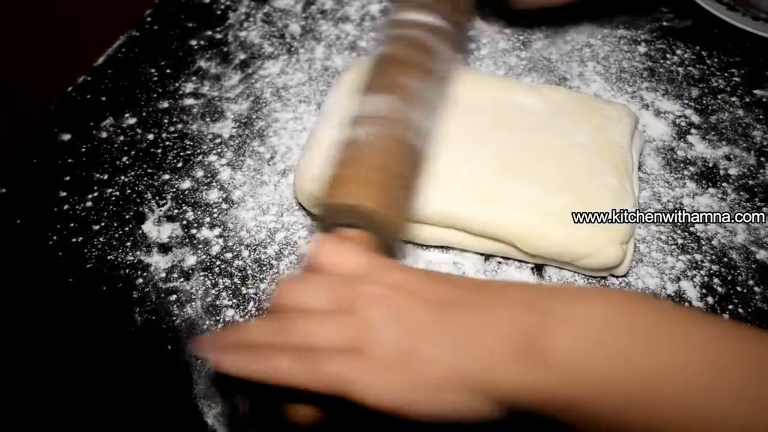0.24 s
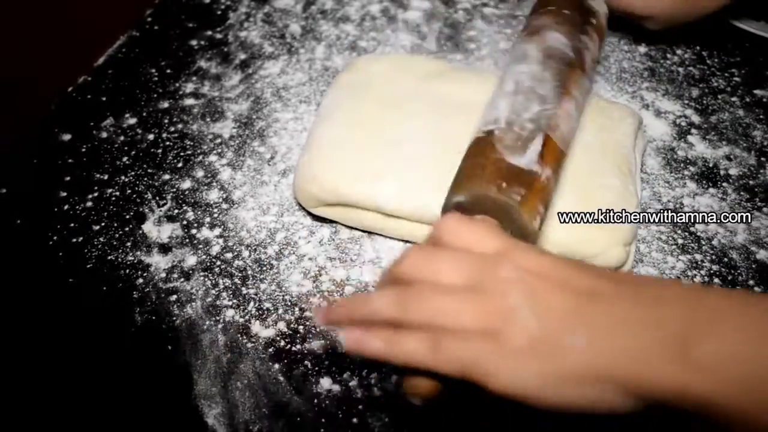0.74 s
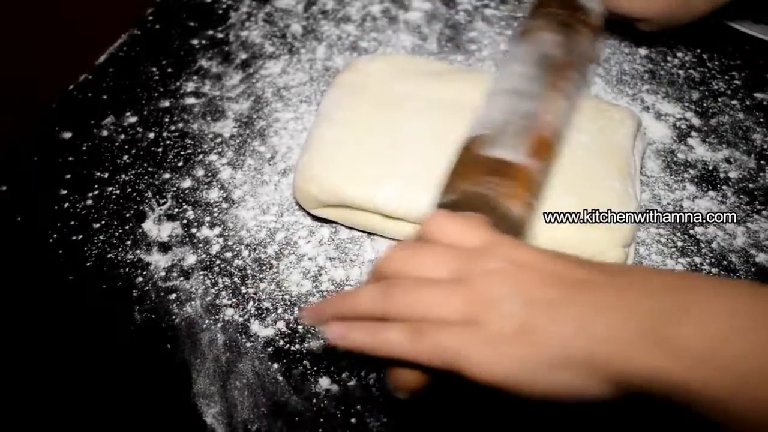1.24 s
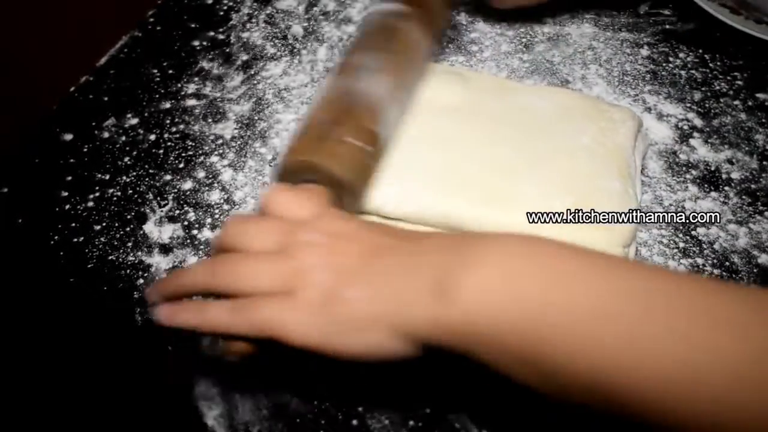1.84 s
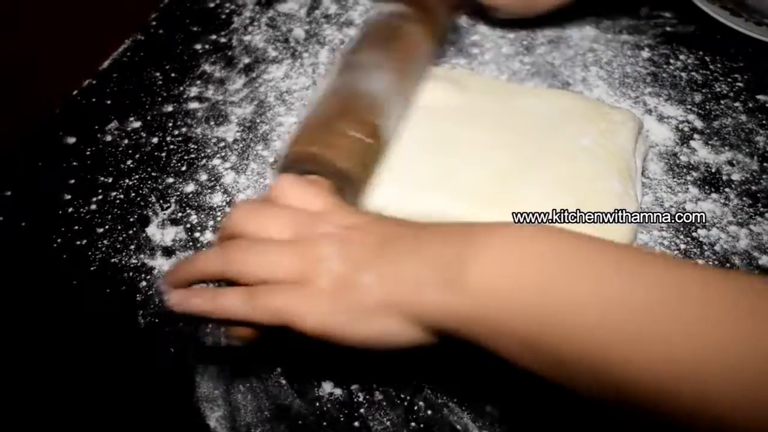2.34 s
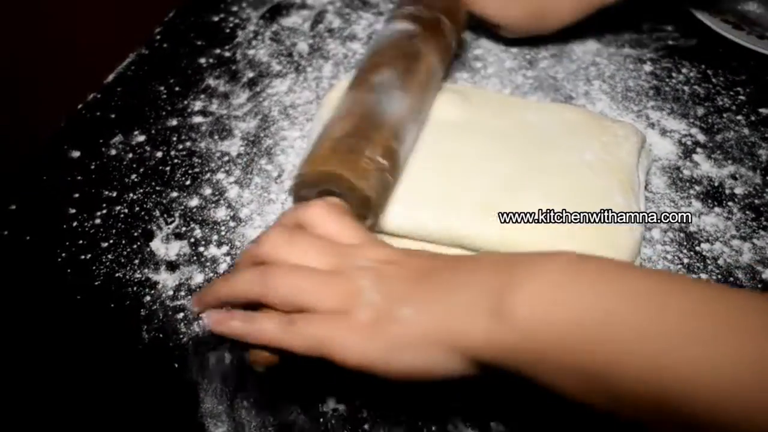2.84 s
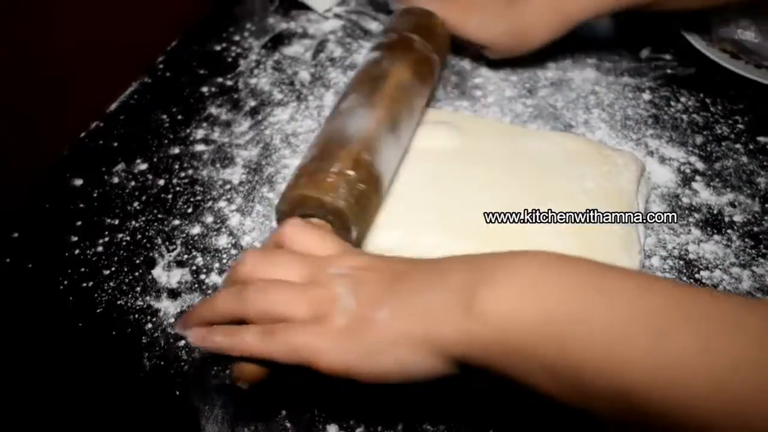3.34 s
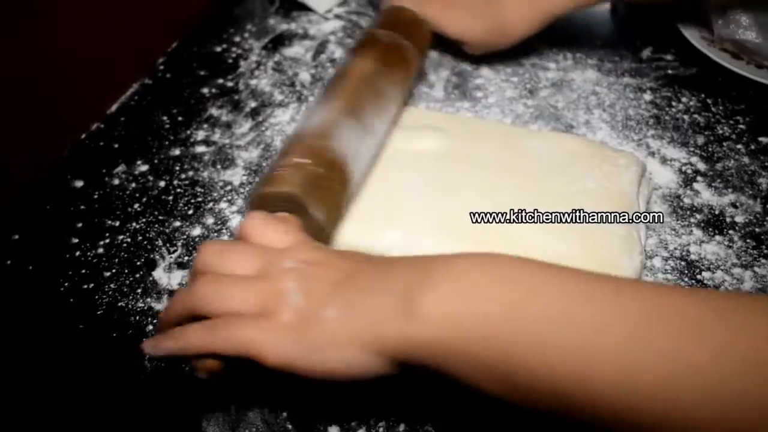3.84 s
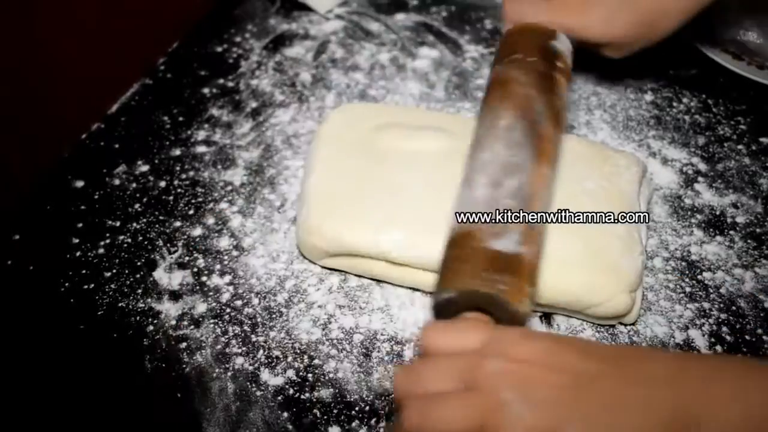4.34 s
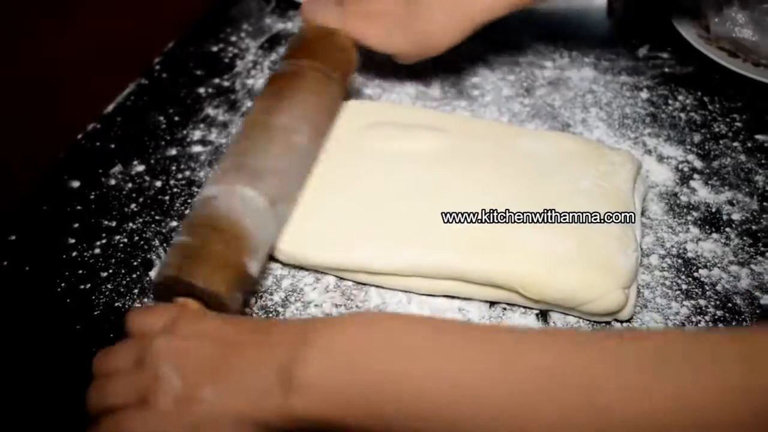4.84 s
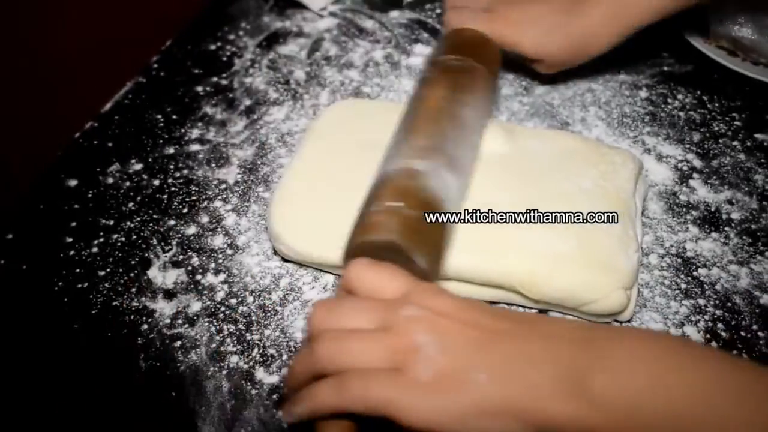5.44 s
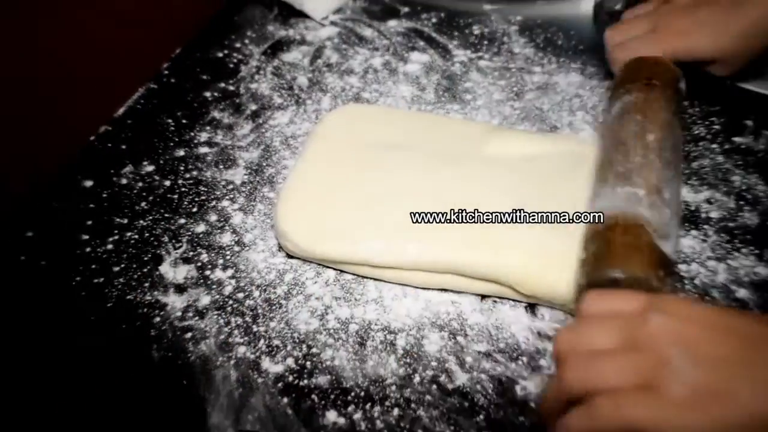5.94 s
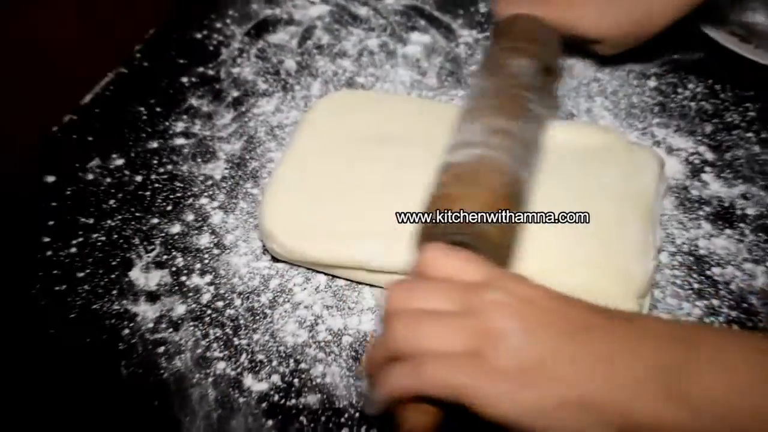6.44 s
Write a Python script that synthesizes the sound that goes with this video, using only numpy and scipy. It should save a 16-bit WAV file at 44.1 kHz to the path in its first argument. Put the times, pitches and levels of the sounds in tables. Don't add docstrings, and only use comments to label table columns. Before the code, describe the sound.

A hard, quiet kitchen holds a steady, slightly wavering low appliance drone, midrange hum and thin fan hiss. From the start a wooden rolling pin strokes dough close by, about four faint, high, gritty flour hisses per second, with a barely audible woody singing. Tiny dry handle ticks fall at 0.36 s, in a cluster at 1.87 s, at 2.39 s, and in quick rattles at 3.31 and 3.84 s. A soft ringing bump comes at 4.0 s. At 4.33 s the pin hits bare stone: a very loud, bright clack of several contacts within 15 milliseconds, slightly clipped, with a short room tail and thin ring. A second, flatter and longer chattering clack follows at 5.22 s, lasting about 25 milliseconds. Afterwards come a faint tick at 5.58 s, sparse soft strokes and a dull dough bump near 5.98 s, with the hum continuing to the end around 6.7 s.

```python
import sys
import numpy as np
from scipy import signal
from scipy.fft import rfft, irfft, next_fast_len
from scipy.io import wavfile
from scipy.ndimage import uniform_filter1d, map_coordinates

SR = 44100
rng = np.random.default_rng(int(sys.argv[2]) if len(sys.argv) > 2 else 0)


def invert_db(x):
    u = np.asarray(x, float) / 20
    return 10 ** u


def master(y):
    cut = np.clip(np.atleast_2d(y).T, -1, 1)
    pcm = np.round(cut * 32767)
    wavfile.write(sys.argv[1], SR, pcm.astype(np.int16))


N = 295716

# (frequency [Hz], density [dB per Hz])
AIR_COLOUR = [(150, -62), (220, -14), (319, -1), (850, -5.5), (1220, -8.5), (2530, -16.5), (3800, -23),
              (16000, -32.5)]
# (frequency [Hz], density [dB per Hz])
RUMBLE_COLOUR = [(12, -43.5), (30, -25), (60, -6), (140, -1), (200, -9), (300, -61)]
# (frequency [Hz], width [Hz], level [dB])
DRONE_BANDS = [(50, 18, -8.5), (99, 12, -1), (153.7, 20, -0.5)]
# (frequency [Hz], width [Hz], level [dB])
HUM_BANDS = [(303, 110, -6.5), (648, 64, -5), (902, 50, -0.5), (981, 120, -2.5)]
# (frequency [Hz], width [Hz], level [dB])
FAN_BANDS = [(2620, 450, -7.5), (5620, 880, -3), (5980, 860, -0.5), (6740, 260, -3.5)]
# (middle [s], length [s], flour hiss level [dB], singing pin level [dB])
ROLLING_STROKES = [(0.095, .2, -71, -74), (0.338, 0.17, -68.5, -71.5), (0.508, 0.13, -67, -69),
                   (0.729, 0.1, -64.5, -69.5), (0.92, 0.22, -73, -75), (1.152, 0.17, -69, -75),
                   (1.385, .19, -67.5, -70), (1.65, .16, -67, -65.5), (1.87, 0.18, -69, -67),
                   (2.132, 0.16, -68.5, -70), (2.364, 0.16, -64, -66.5), (2.64, 0.16, -69, -75),
                   (2.841, 0.14, -71, -66), (3.06, .16, -75, -78), (3.285, 0.23, -73.5, -76),
                   (3.524, 0.2, -76, -80), (3.807, 0.31, -74, -73.5), (4.004, .08, -80, -80),
                   (4.327, 0.11, -65.5, -63.5), (4.72, .3, -70, -85), (5.205, .07, -65, -69.5),
                   (5.717, 0.36, -75, -92), (5.999, .07, -75, -82), (6.35, 0.065, -80, -65),
                   (6.539, 0.32, -73.5, -79)]
# (frequency [Hz], density [dB per Hz])
FLOUR_COLOUR = [(1500, -120), (2500, -16), (4500, -10), (7000, -10), (8200, -5), (9200, 0), (10150, -14.5),
                (16000, -32.5)]
# (time [s], peak [dB], pitch [Hz], upper pitch [Hz], ring T60 [s])
HANDLE_TICKS = [(0.3594, -64, 3430, 4600, .025), (1.871, -55, 3200, 3780, .02),
                (1.8755, -47, 3150, 3770, .03), (1.879, -55, 3430, 3780, 0.022),
                (2.3894, -58, 3080, 4020, .025), (3.3075, -49, 3540, 4540, .015),
                (3.3105, -55, 3500, 4600, 0.017), (3.3133, -41, 3450, 4620, 0.0096),
                (3.8348, -42.5, 3588, 4470, .008), (3.839, -52, 2900, 4300, 0.0088),
                (3.8412, -54, 3120, 4500, .008), (3.8443, -48.5, 3286, 4240, .008),
                (3.849, -49, 3000, 3980, .01), (5.5794, -56, 3120, 4110, 0.019)]
# (time [s], peak [dB], pin ring level [dB])
DOUGH_BUMPS = [
    (4.007, -50.5, 3.5),
    (4.385, -55, -27),
    (5.982, -51, -16),
]
# (frequency [Hz], level [dB], T60 [s])
BUMP_MODES = [(406, 7, .11), (716, -8, .05)]
# (frequency [Hz], level [dB], T60 [s])
THIN_DOUGH_MODES = [(1150, 0, 0.11), (1300, -8.5, .03)]
# (frequency [Hz], T60 [s])
KITCHEN_DECAY = [(500, 0.55), (1300, 0.46), (2600, 0.52), (4500, 0.44), (9000, 0.35), (14000, 0.092)]
# (time [s], level [dB], hardness [dB per octave], thud level [dB])
STONE_CONTACTS = [(4.334, -7, 0.5, -17), (4.3352, -5.5, 6.5, -14), (4.3402, -6.5, 3, -25.5),
                  (4.3427, -14.5, 4.5, -16), (4.348, -9, -6, -15), (5.2213, -6, -1.5, -12),
                  (5.2240, -4, 2.5, -21.5), (5.23, -7.5, 1.5, -10), (5.2360, -4.5, -1.5, -12),
                  (5.2416, -11, 2, -13.5), (5.2460, -12, 0.5, -13)]
# (earliest time [s], lowest [Hz], highest [Hz], time at which dough and hand still the pin [s])
PIN_LANDINGS = [
    (4, 870, 17000, 4.358),
    (5, 390, 10820, 5.2495),
]
# (frequency [Hz], end-struck level [dB], flat-struck level [dB], T60 [s])
PIN_MODES = [(2110, -10.5, -13.5, .05), (2425, -4.5, -2, 0.082), (2570, 2.5, 2, 0.05),
             (2697, -6.5, -3, 0.057), (2822, -6.5, -8.5, 0.054), (3070, -13.5, -7.5, 0.041),
             (3706, -15.5, -21, .03), (4118, -1, -11, 0.032), (4295, 2.5, 0, 0.032),
             (5145, -8.5, -10.5, .04), (5240, -8, -16.5, .03), (6080, -14.5, -24, .04),
             (6150, -15, -22.5, .03), (7440, -16.5, -15.5, 0.029)]
# (frequency [Hz], end-struck level [dB], flat-struck level [dB], T60 [s])
WORKTOP_MODES = [(452, -24.5, -14.5, .06), (626, -23.5, -15, 0.049), (965, -7, -13.5, 0.045),
                 (1218, -9, 0, 0.045), (1467, 5.5, 2.5, .04), (1904, -5.5, 1.5, 0.044)]
# (frequency [Hz], density [dB per Hz])
CRACK_COLOUR = [(500, -41), (1500, -11), (4000, 8.5), (8000, 1.5), (15000, -25)]
# (frequency [Hz], width [Hz], end-struck level [dB], flat-struck level [dB], T60 [s])
LINGERING_MODES = [(2502, 89, -34, -30, .8), (3155, 90, -48.5, -38, .43), (4230, 200, -37, -38.5, .55),
                   (5136, 130, -35, -47.5, 0.34), (5960, 90, -53, -41, .33), (6013, 120, -50.5, -53.5, .38),
                   (7420, 290, -52.5, -50.5, 0.34), (8840, 200, -53, -52.5, 0.38)]

NOISE_TOP_HZ = 15720
STROKE_EDGE_DB = 11
SING_SHARE = 0.54
LOOSE_PITCH, WORKED_PITCH = 1.02, 0.94
WORK_IN_S = 5.1
STILL_T60_S = 0.015
SETTLE_DB_PER_S2 = 59


def unit(x):
    return x / np.sqrt(np.mean(x ** 2) + 1e-20)


def along(points, hz):
    f, v = np.transpose(points)
    return np.interp(np.log(hz + 1), np.log(f + 1), v)


def wobble(rate):
    knots = rng.standard_normal(int(N * rate / SR) + 4)
    return map_coordinates(knots, [np.arange(N) * rate / SR])


def noise(gain):
    m = next_fast_len(N + 8192)
    hz = np.fft.rfftfreq(m, 1 / SR)
    spectrum = rfft(rng.standard_normal(m)) * gain(hz) * (hz < NOISE_TOP_HZ)
    return unit(irfft(spectrum, m)[:N])


def coloured(points, pitch=1):
    return lambda f: invert_db(along(points, f / pitch))


def bands(peaks):
    return lambda f: np.sqrt(sum(invert_db(2 * db) / (1 + (2 * (f - c) / w) ** 2) ** 2 for c, w, db in peaks))


def streaked(x, depth_db):
    z = signal.stft(x, nperseg=512)[2]
    field = uniform_filter1d(rng.standard_normal(z.shape), size=2, axis=0)
    field = uniform_filter1d(field, size=22, axis=1)
    return signal.istft(z * invert_db(depth_db * unit(field)), nperseg=512)[1][:N]


def ring(modes, scatter_db, attack, tilt_db=0):
    t = np.arange(SR // 4) / SR
    luck = rng.standard_normal((len(modes), 2))
    out = np.zeros(len(t))
    for (hz, db, t60), (strength, phase) in zip(modes, luck):
        level_db = db + scatter_db * strength + tilt_db * np.log2(hz / 3000)
        out += invert_db(level_db - 60 * t / t60) * np.sin(2 * np.pi * hz * t + 0.5 * phase)
    return (1 - np.exp(-t / attack)) * out


def struck(modes, way):
    return [(hz, dbs[way], t60) for hz, *dbs, t60 in modes]


def add(track, s, sound):
    track[round(s * SR):][:len(sound)] += sound


def background():
    air = invert_db(-63.5 + 0.53 * wobble(3)) * noise(coloured(AIR_COLOUR))
    rumble = invert_db(-74.5 + 0.6 * wobble(2.5)) * noise(coloured(RUMBLE_COLOUR))
    drone = invert_db(-68.5 + 2.1 * wobble(2.5)) * noise(bands(DRONE_BANDS))
    hum = invert_db(-65.5 + 1.3 * wobble(4.0)) * noise(bands(HUM_BANDS))
    fan = invert_db(-70 + 0.6 * wobble(3.3)) * noise(bands(FAN_BANDS))
    return air + rumble + drone + hum + fan


def rolling():
    coarse_t, t = np.arange(0, N + 50, 50) / SR, np.arange(N) / SR
    hiss_gain, sing_gain = np.zeros(len(coarse_t)), np.zeros(len(coarse_t))
    for middle, length, hiss_db, sing_db in ROLLING_STROKES:
        offset = 2 * (coarse_t - middle) / length
        hiss_gain += invert_db(hiss_db - STROKE_EDGE_DB * offset ** 2)
        sing_gain += invert_db(sing_db - STROKE_EDGE_DB * (offset / SING_SHARE) ** 2)
    grains = invert_db(1.5 * wobble(60) + 1.5 * wobble(440))
    loose = noise(coloured(FLOUR_COLOUR, LOOSE_PITCH))
    worked = noise(coloured(FLOUR_COLOUR, WORKED_PITCH))
    share = np.clip(t / WORK_IN_S, 0, 1)
    flour = np.sqrt(1 - share) * loose + np.sqrt(share) * worked
    hiss = unit(grains * streaked(flour, depth_db=2.0))
    sing = noise(bands([(2470, 130, -1), (2773, 500, -17)]))
    return np.interp(t, coarse_t, hiss_gain) * hiss + np.interp(t, coarse_t, sing_gain) * sing


def handles():
    out = np.zeros(N + SR)
    for s, db, hz, upper_hz, t60 in HANDLE_TICKS:
        tick = [(hz, 0, t60), ((hz + upper_hz) / 2, -5, 0.7 * t60), (upper_hz, -1.5, t60),
                (8500, -10, 0.008), (900, -4, 0.012)]
        add(out, s, invert_db(db - 1) * ring(tick, 1.5, 0.0008))
    for s, db, ring_db in DOUGH_BUMPS:
        pin = invert_db(-2.5) * ring(struck(PIN_MODES[:4], 1), 2.2, 0.001)
        hard = pin + ring(THIN_DOUGH_MODES, 1, 0.002)
        add(out, s, invert_db(db) * (ring(BUMP_MODES, 0.94, 0.0028) + invert_db(ring_db) * hard))
    return out[:N]


def kitchen(x):
    out = np.zeros(N)
    for part in (slice(0, 5 * SR), slice(5 * SR, N)):
        hz, t, z = signal.stft(rng.standard_normal(SR), SR, nperseg=256)
        decay = invert_db(-60 * t / along(KITCHEN_DECAY, hz)[:, None])
        tail = signal.istft(z * decay, SR, nperseg=256)[1]
        tail = np.pad(tail / np.linalg.norm(tail), (300, 0))
        add(out, part.start / SR, signal.fftconvolve(x[part], tail)[:N - part.start])
    return out


def clacks():
    out, t = np.zeros(N + SR), np.arange(SR // 4) / SR
    crack_gain = invert_db(along(CRACK_COLOUR, np.fft.rfftfreq(len(t), 1 / SR)))
    for s, db, hard_db, thud_db in STONE_CONTACTS:
        way = sum(row[0] < s for row in PIN_LANDINGS) - 1
        _, low_hz, high_hz, still_s = PIN_LANDINGS[way]
        grit = irfft(rfft(rng.standard_normal(len(t))) * crack_gain, len(t))
        crack = invert_db(-8.5 + 1.46 * hard_db - 60 * t / 0.017) * unit(grit)
        stilled = invert_db(-60 * np.maximum(s + t - still_s, 0) / STILL_T60_S)
        pin = stilled * ring(struck(PIN_MODES, way), 0.96, 0.00043, hard_db)
        thud = invert_db(thud_db) * ring(struck(WORKTOP_MODES, way), 1.5, 0.00092)
        limits = [low_hz, min(high_hz, 0.45 * SR)]
        band = signal.butter(6, limits, "band", fs=SR, output="sos")
        add(out, s, invert_db(db - 6.0) * signal.sosfilt(band, pin + thud + crack))
    return out[:N]


def after_ring():
    out, t = np.zeros(N), np.arange(SR) / SR
    onset = 1 - np.exp(-t / 0.0069)
    for hz, width, *dbs, t60 in LINGERING_MODES:
        ringing = noise(bands([(hz, width, 0)]))
        for db, (*_, still_s) in zip(dbs, PIN_LANDINGS):
            fade = invert_db(db - 60 * t / t60 - SETTLE_DB_PER_S2 * t ** 2)
            add(out, still_s - 0.01, fade * onset * ringing[round(still_s * SR):][:SR])
    return out


def scene():
    near = handles() + clacks()
    pin = near + invert_db(-16) * kitchen(near) + after_ring() + rolling()
    return (pin + background())[None]


def top_cut(x):
    return signal.sosfilt(signal.butter(12, 16510, fs=SR, output="sos"), x)


def record(dry):
    shaved = dry - dry / (1 + np.abs(dry / 0.88) ** 9) ** (1 / 9)
    above_bass = signal.butter(4, 1000, "high", fs=SR, output="sos")
    clipped = dry - signal.sosfilt(above_bass, shaved)
    return top_cut(clipped)


dry = scene()
out = record(dry)
master(out)
```